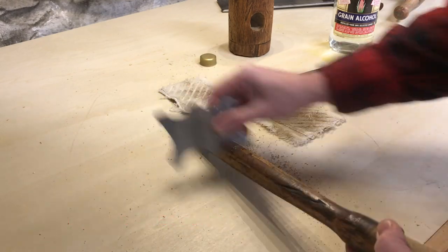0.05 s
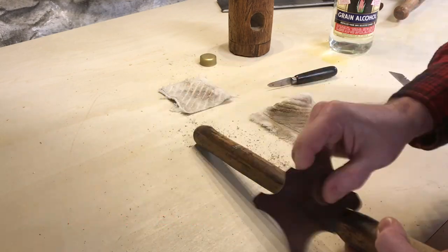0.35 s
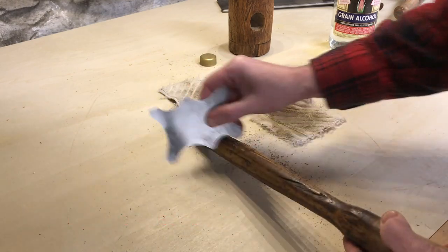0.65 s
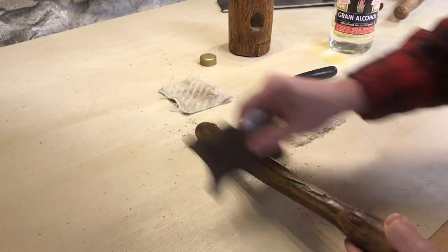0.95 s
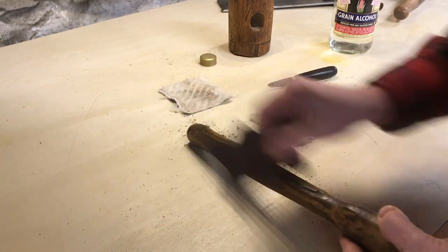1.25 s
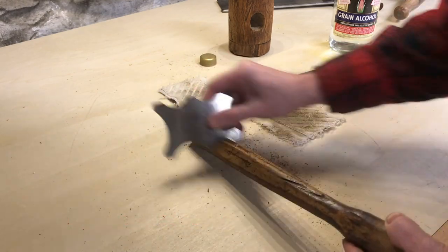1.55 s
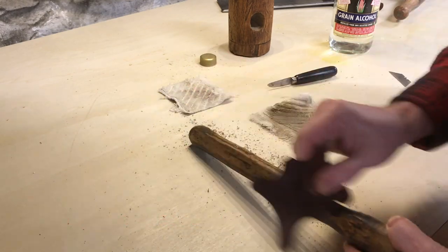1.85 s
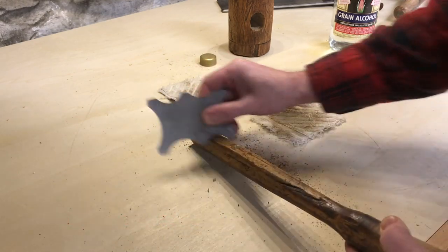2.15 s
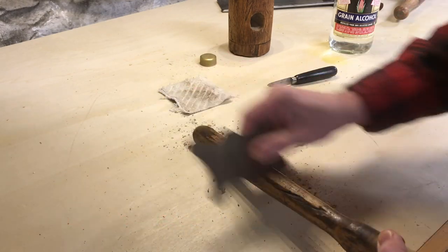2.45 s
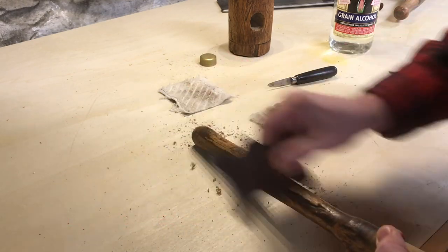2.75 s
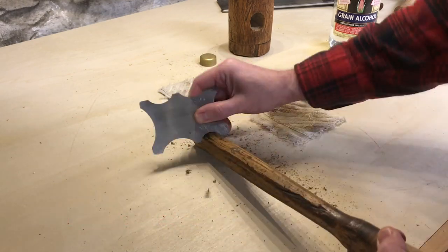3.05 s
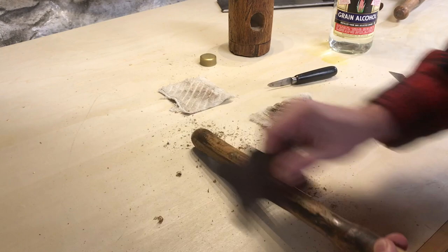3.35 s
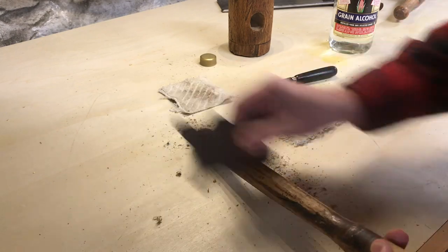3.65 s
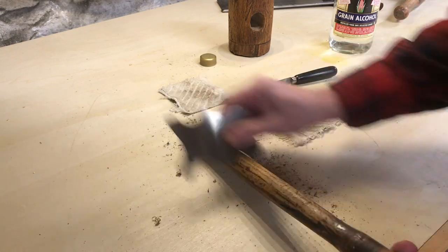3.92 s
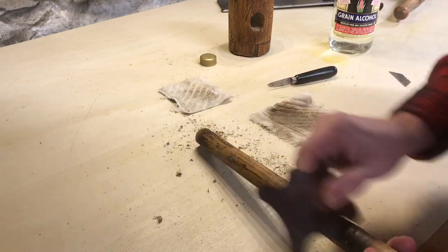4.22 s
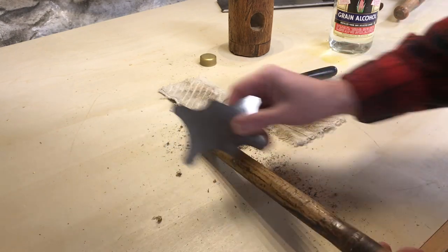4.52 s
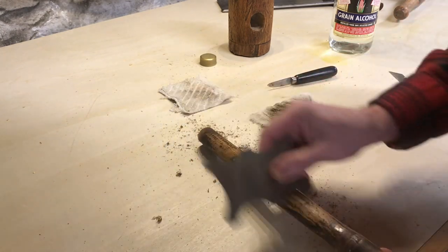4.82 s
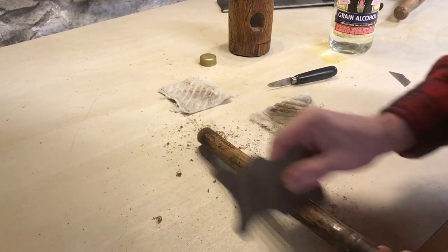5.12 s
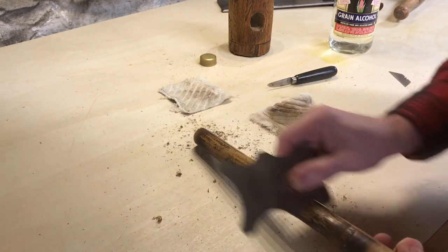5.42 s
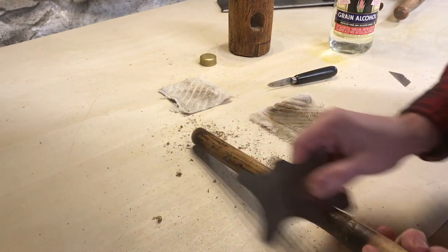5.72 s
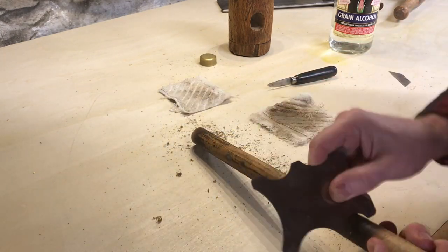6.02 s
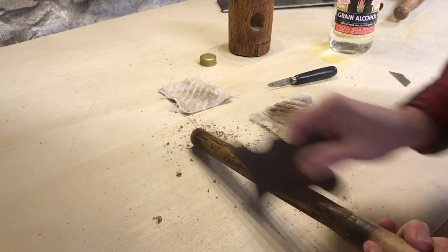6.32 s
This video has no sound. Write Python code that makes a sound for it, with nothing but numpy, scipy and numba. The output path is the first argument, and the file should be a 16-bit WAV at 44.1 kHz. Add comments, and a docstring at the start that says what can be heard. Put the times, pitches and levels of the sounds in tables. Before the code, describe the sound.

A thin steel scraper is pulled along a wooden handle about twice a second, each stroke a dry rasp with a bright metallic ring. Between pulls the blade lands with a light knock or a soft drag, and in the earlier strokes its edge sometimes catches with a tiny squeak. Toward the end the strokes get shorter and softer and the knocks sharper. It is heard close in a small workshop with a faint low hum.

```python
"""A steel card scraper takes old finish off a wooden handle on a workbench, heard close on one microphone.
The blade lands with a knock or a light drag, then is pulled along the wood: fibres tear, blade and
handle ring. Now and then the edge catches with a short squeak; faint rustles fall between some pulls.
The place is a small workshop: faint, short reflections from near walls, and a low hum behind the work."""
import sys
import numpy as np
from scipy import signal
from scipy.fft import rfft, irfft, next_fast_len
from scipy.io import wavfile
from scipy.ndimage import uniform_filter1d
from numba import njit

SR = 44100
rng = np.random.default_rng(int(sys.argv[2]) if len(sys.argv) > 2 else 0)


def waveform_to_disk(signal):
    """Save audio, clipped to [-1, 1], as 16-bit WAV at the path in sys.argv[1]."""
    frames = np.transpose(np.atleast_2d(signal))
    scaled = np.clip(frames, -1, 1) * 32767
    samples = np.round(scaled).astype(np.int16)
    wavfile.write(sys.argv[1], SR, samples)


N = 280917
T = np.arange(N) / SR

# room tone, the still air of the workshop: frequency_hz, density_db
AIR_SPECTRUM = [(25, -15.5), (55, 12), (90, 6), (170, 3), (260, -2.5), (370, 2), (500, -16), (750, -11),
                (950, -16.5), (1600, -20.5), (4500, -25), (8000, -30.5), (16000, -30.5)]
# workshop hum: pitch_hz, level_db, unsteadiness (0-1)
HUM_LINES = [(65, -60, 0.3), (82.8, -68, 1), (119, -66.5, 0.3)]
# slow wavering of the hum's deepest lines: time_s, level_db
HUM_WAVER = [(0.0, -55), (0.12, -66), (0.53, -53), (0.65, -65.5), (0.94, -57), (2.61, -66), (2.68, -58),
             (3.74, -60.5), (3.85, -75), (3.99, -59.5), (4.67, -68.5), (4.74, -54.5), (5.73, -63),
             (5.78, -53.5), (6.16, -57), (6.37, -68)]
# the handle ringing on the bench: pitch_hz, level_db, t60_s
WOOD_MODES = [(239, -5.5, 0.16), (323, -6.5, 0.32), (397, -7, 0.25), (577.3, -4, 0.13), (658, -8, 0.19),
              (778, -15, 0.11), (931, -4.5, 0.052), (1116, -4.5, 0.059), (1367, -9.5, 0.057),
              (1590, -6.5, 0.026), (1800, -3, 0.033), (2050, 1, 0.025), (2420, -2.5, 0.026),
              (3146, -4, 0.025), (3950, -5, 0.035), (5570, -7, 0.043)]
# the blade lands and the handle hits the bench: start_s, level_db, centre_hz
KNOCKS = [(0.788, -30, 830), (0.806, -34, 670), (1.296, -29, 1000), (1.2995, -40, 900), (1.309, -35, 786),
          (1.815, -41, 800), (2.341, -25.5, 870), (2.348, -37, 810), (2.656, -41.5, 1160),
          (2.777, -41.5, 696), (2.792, -43, 760), (3.297, -26, 1870), (3.302, -29, 1030),
          (3.365, -26.5, 1050), (3.575, -34.5, 1800), (3.741, -42, 1390), (3.764, -36.5, 1260),
          (4.243, -35.5, 810), (4.675, -27, 2030), (4.689, -35, 1770), (5.025, -29, 1270),
          (5.031, -17.5, 1970), (5.3177, -21, 1710), (5.663, -22.5, 1900), (6.234, -46, 906)]
# blade modes that a catch rings: pitch_hz, width_hz, level_db
CATCH_MODES = [(2280, 180, -7.5), (4366, 340, -3.5), (6200, 670, -3.5), (9700, 970, 1), (13030, 400, -2.5),
               (15300, 1100, -6)]
# the edge catches: middle_s, length_s, level_db
CATCHES = [(0.0616, 0.010, -24.5), (1.025, 0.013, -28.5), (1.427, 0.0021, -33), (2.046, 0.01, -28),
           (2.53, 0.01, -30), (3.44, 0.0015, -44), (3.88, 0.0022, -41)]
# light drags and faint, soft rustles between pulls: start_s, end_s, low_db, mid_db, hiss_db
DRAGS_AND_RUSTLES = [ (0.147, 0.232, -69, -74, -74), (.279, 0.369, -49.5, -50, -52.5),
                     (0.76, 0.856, -48, -51, -56.5), (1.143, 1.295, -65, -85, -90),
                     (1.293, 1.346, -45, -51, -53), (1.647, 1.731, -62, -66, -66),
                     (1.76, 1.85, -54, -51.5, -56), (2.134, 2.225, -68.5, -77, -79),
                     (2.65, 2.76, -57.5, -65, -65.5), (2.725, 2.823, -52.5, -56, -58.5),
                     (3.065, 3.135, -65, -69, -72), (3.668, 3.735, -51.5, -49, -51.5),
                     (3.74, 3.79, -46.5, -52, -53), (4.215, 4.27, -47.5, -53.5, -52.5),
                     (4.533, 4.67, -78, -78.5, -92), (6.013, 6.051, -53, -60, -60.5),
                     (6.26, 6.322, -76, -82.5, -89)]
# pulls along the handle: start_s, end_s, start_place, end_place (0-1 along the wood),
# ring_db (extra on the blade's lowest bending note), handle_db, blade_db, hiss_db, pressure_rise_db
PULLS = [ (-.053, 0.143, 0.12, 0.94, 2, -44, -39.5, -40.5, 0),
         (0.366, 0.627, 0.03, 1, 0, -45.5, -37.5, -41.5, 0),
         (0.854, 1.11, .05, 0.82, -1, -46, -39, -41, -0.5),
         (1.351, 1.624, .05, 0.88, 2.5, -47, -40, -40.5, -2.5),
         (1.847, 2.123, 0, 1, 2.5, -46, -39, -39.5, 3.5),
         (2.362, 2.622, .1, 1, 5.5, -45.5, -38.5, -41.5, 5),
         (2.834, 3.066, 0.11, .95, 4, -44.5, -37.5, -40.5, 6),
         (3.31, 3.555, 0.2, 0.96, 7, -42.5, -37.5, -41.5, -4.5),
         (3.793, 4.037, 0.07, 0.76, 5.5, -43.5, -36.5, -40, -0.5),
         (4.272, 4.491, 0.3, .6, 6, -46, -37.5, -42.5, 0.5),
         (4.676, 4.897, 0.4, 0.44, -0.5, -49.5, -41.5, -47, 5.5),
         (5.037, 5.212, .4, .62, -2.5, -48.5, -42.5, -50, -1.5),
         (5.347, 5.533, .2, 0.5, -3.5, -51, -45, -50, -8), (5.686, 5.88, .1, .8, -3, -48.5, -42.5, -47, -1),
         (6.052, 6.247, 0.4, 0.7, -1.5, -46.5, -41.5, -46.5, 1)]
# how handle, blade and hiss (a row each) answer a pull:
# attack_s, release_s, rise_db, mid_swell_db, after_ring_db, after_ring_t60_s
PULL_SHAPES = [(0.047, 0.067, 2.5, -1, -17, 0.15), (0.061, 0.03, -10.5, 8, -39.5, 0.21),
               (0.039, 0.045, -3, 6.5, -32, .15)]
# tearing fibres: frequency_hz, density_db
TEARING_SPECTRUM = [(150, -20), (330, 5.5), (500, -27), (900, -0.5), (1750, -9), (2300, -2), (2750, -13),
                    (3600, 8.5), (6000, -6.5), (8000, 0.5), (9300, 6), (10400, -3), (13000, 2.5),
                    (16000, -1)]
# resonances that shift as the edge travels: place_0_hz, place_1_hz, width_hz, level_db
SCRAPE_MODES = [(237, 210, 25, -26), (334.3, 335, 7.3, -10.5), (382.2, 385, 14, -8), (443, 390, 18, -18),
                (561, 574, 13, -19), (648, 663, 17, -21.5), (881, 925, 64, -7), (982, 1030, 110, -12.5),
                (1202, 1250, 50, -14), (1284, 1445, 47, -9), (1945, 2420, 160, -9.5),
                (2171, 2260, 58, -9.5), (2964, 3300, 19, -19), (3416, 3700, 240, -18.5),
                (3790, 5050, 120, 3), (4398, 4420, 37, 0), (5210, 6000, 150, -4.5), (5536, 5650, 170, 0.5),
                (6800, 6770, 30, -9.5), (6070, 7400, 150, -17), (8500, 8700, 180, -9),
                (9020, 10000, 160, -18), (9940, 9820, 130, -12), (10750, 10705, 50, -6),
                (12600, 12860, 120, -4), (13820, 13850, 260, -10), (14500, 13000, 220, -15.5),
                (15300, 12000, 190, -9)]
# when in a pull the blade's main notes sing best: pitch_hz, progress (0-1)
BEST_SINGING = [(3850, 0.26), (4370, 0.37), (5600, 0.33)]


def from_db(db):
    """Decibels to gain."""
    return 10 ** (np.asarray(db) / 20)


def rms_one(x):
    """Scale to rms 1."""
    return x / np.sqrt(np.mean(x ** 2) + 1e-20)


def steady(x):
    """Even out swells longer than 30 ms, keeping the grain; rms 1."""
    return x / np.sqrt(np.abs(uniform_filter1d(x ** 2, int(.03 * SR))) + 1e-12)


def drift(rate_hz):
    """Smooth random wander with about `rate_hz` turns a second; rms 1."""
    r = np.exp(-80 * np.pi * rate_hz / SR)
    noise = rng.standard_normal(N // 40 + 2002)   # one value every 40 samples
    slow = signal.lfilter([1], [1, -2 * r, r * r], noise)[2000:]
    return np.interp(np.arange(N) / 40, np.arange(len(slow)), rms_one(slow))


def colour(x, spectrum):
    """Give x a smooth spectrum; rms 1."""
    hz, db = np.transpose(spectrum)
    size = next_fast_len(N)
    bins_hz = np.arange(size // 2 + 1) * SR / size
    gain = from_db(np.interp(np.log(bins_hz + 1), np.log(hz), db))
    return rms_one(irfft(rfft(x, size) * gain, size)[:N])


def band(x, edges_hz, order):
    """Butterworth band-pass."""
    return signal.sosfilt(signal.butter(order, edges_hz, "band", fs=SR, output="sos"), x)


@njit
def resonate(x, hz, width_hz):
    """A resonance whose centre may move from sample to sample."""
    turn = 2 * np.pi * hz / SR
    decay = np.exp(-np.pi * width_hz / SR)
    out, state = np.zeros(len(x)), 0j
    for i in range(len(x)):
        state = state * decay * complex(np.cos(turn[i]), np.sin(turn[i])) + x[i]
        out[i] = state.real
    return out


def room_tone(air_db, waver_share):
    """Behind the work: low, wavering hum lines over quiet air."""
    out = from_db(air_db) * colour(rng.standard_normal(N), AIR_SPECTRUM)
    waver_db = np.interp(T, *np.transpose(HUM_WAVER))
    waver = from_db(waver_share * (waver_db - waver_db.mean()))
    for hz, db, unsteady in HUM_LINES:
        swell = 1 - unsteady + unsteady * (drift(2.6) + 1j * drift(3.0)) / 2   # level and phase wander
        if hz < 100:
            swell *= waver
        out += from_db(db) * rms_one(np.real(swell * np.exp(2j * np.pi * hz * T)))
    return out


def workshop(direct, tail_db, t60_s):
    """Dense reflections from the bench and near walls reach the microphone 3 ms after the direct sound."""
    t = T[:SR // 3]
    tail = band(rng.standard_normal(len(t)), [200, 7000], order=1)
    tail *= from_db(-60 * t / t60_s) * (t > .003)
    return direct + from_db(tail_db) * signal.fftconvolve(direct, tail / np.linalg.norm(tail))[:N]


def knocks(gain_db, spread_octaves, rattle_db, rattle_t60_s, tick_db, tick_t60_s):
    """Each blow rings the wood modes near its centre, with a brief bench rattle and a steel tick."""
    out, t = np.zeros(N + SR), T[:SR // 4]
    hz, mode_db, t60_s = np.transpose(WOOD_MODES)[:, :, None]
    modes = np.sin(2 * np.pi * hz * t) * from_db(-60 * t / t60_s)
    for start_s, db, centre_hz in KNOCKS:
        weight = from_db(mode_db + rng.normal(0, 0.96, hz.shape))
        weight /= 1 + (np.log2(hz / centre_hz) / spread_octaves) ** 2
        ring = np.sum(weight * rng.choice([-1, 1], hz.shape) * modes, axis=0)
        rattle = band(rng.standard_normal(len(t)), [centre_hz * 0.26, centre_hz * 1.16], order=3)
        rattle = rms_one(rattle) * from_db(rattle_db - 60 * t / rattle_t60_s)
        tick = rng.standard_normal(len(t)) * from_db(tick_db - 60 * t / tick_t60_s)
        blow = ring / np.abs(ring).max() + rattle + tick
        at = int(start_s * SR)
        out[at:at + len(t)] += from_db(db + gain_db) * blow / np.abs(blow).max()
    return band(out[:N], [200, 16000], order=2)


def catches(gain_db):
    """The edge sticks and lets go in a bright burst on the blade's upper modes."""
    squeak = np.zeros(N)
    for hz, width_hz, db in CATCH_MODES:
        squeak += from_db(db) * rms_one(resonate(rng.standard_normal(N), np.full(N, hz), width_hz))
    bursts = sum(from_db(db) / (1 + (2 * (T - middle_s) / length_s) ** 8)
                 for middle_s, length_s, db in CATCHES)
    return from_db(gain_db) * steady(band(squeak, [1500, 16000], order=2)) * bursts


def hand(resting_place, resting_ring_db):
    """The hand's travel: progress through the pull, place of the edge, freedom of the blade to ring."""
    progress, place, ring_db = np.zeros(N), np.full(N, resting_place), np.full(N, resting_ring_db)
    for start_s, end_s, start_place, end_place, db, *_ in PULLS:
        during = (T >= start_s) & (T < end_s)
        progress[during] = (T[during] - start_s) / (end_s - start_s)
        place[during] = start_place + (end_place - start_place) * progress[during]
        ring_db[during] = db
    return progress, place, ring_db


def stroke(start_s, end_s, attack_s, release_s):
    """A rubbing contact sets in, holds and lets go; gain 0-1."""
    return np.clip((T - start_s) / attack_s, 0, 1) * np.clip((end_s - T) / release_s, 0, 1)


def drag_and_rustle_power(attack_s, release_s, sag_db_per_s):
    """Power in three bands of the light drags and faint, soft rustles between pulls; each one fades."""
    power = np.zeros((3, N))
    for start_s, end_s, *levels_db in DRAGS_AND_RUSTLES:
        sag = from_db(-sag_db_per_s * np.maximum(T - start_s, 0))
        power += (from_db(levels_db)[:, None] * sag * stroke(start_s, end_s, attack_s, release_s)) ** 2
    return power


def pull_power():
    """Power of handle, blade and hiss: each pull follows the hand's speed and pressure, then rings on."""
    power = np.zeros((3, N))
    for start_s, end_s, _, _, _, *levels_db, pressure_db in PULLS:
        from_middle = np.clip((T - start_s) / (end_s - start_s), 0, 1) - .5
        for layer, db, shape in zip(power, levels_db, PULL_SHAPES):
            attack_s, release_s, rise_db, swell_db, after_db, t60_s = shape
            effort = from_db((pressure_db + rise_db) * from_middle - swell_db * (2 * from_middle) ** 2)
            contact = effort * stroke(start_s, end_s, attack_s, release_s)
            lift_off = np.clip(1 + (T - end_s) / release_s, 0, 1)
            after_ring = lift_off * from_db(after_db - 60 * np.maximum(T - end_s, 0) / t60_s)
            layer += (from_db(db) * (contact + after_ring)) ** 2
    return power


def friction(snaps_per_s, spread_db, judder_db):
    """Fibres snap as clicks of uneven size, in clumps as the edge sticks and slips."""
    sizes = from_db(spread_db * np.minimum(rng.exponential(1, N), 4)) * rng.standard_normal(N)
    snapping = rng.random(N) < snaps_per_s / SR
    return rms_one(sizes * snapping * from_db(judder_db * drift(110)))


def scraping(tearing_db, waver_db, swell_db, grain_db, damping_db, tilt):
    """Friction rings blade and handle; the hand's travel bends the resonances and damps the blade."""
    progress, place, ring_db = hand(resting_place=0.24, resting_ring_db=-3.5)
    snaps = friction(snaps_per_s=15000, spread_db=1.5, judder_db=0.3)
    scrape = from_db(tearing_db) * colour(snaps, TEARING_SPECTRUM)
    for base_hz, far_hz, width_hz, db in SCRAPE_MODES:
        hz = base_hz + (far_hz - base_hz) * (place + tilt * drift(7))   # the blade tilts in the hand
        unevenness = np.clip(hz.mean() / 1500, .3, 1)   # the heavy handle's low notes are steadier
        drive = snaps * from_db(unevenness * (waver_db * drift(30) + swell_db * drift(2.25)))
        if 1800 < base_hz < 2600:   # the blade's lowest bending note
            db = db + ring_db
        if 3600 < base_hz < 6000:   # its main notes, damped away from their best moment
            best = np.interp(base_hz, *np.transpose(BEST_SINGING))
            db = db + damping_db * (1 - np.exp(-((progress - best) / 0.4) ** 2))
        scrape += from_db(db) * rms_one(resonate(drive, hz, width_hz))
    bands_hz = [(190, 2800), (2800, 7600), (7600, 17000)]   # handle, blade, hiss
    layers = [steady(band(scrape, edges_hz, order=5)) for edges_hz in bands_hz]
    power = pull_power() + drag_and_rustle_power(attack_s=0.0066, release_s=0.036, sag_db_per_s=22.5)
    return np.sum(layers * np.sqrt(power), axis=0) * from_db(grain_db * drift(25))


def scene():
    """Close to the bench, in mono: scraping, catches and knocks, with the humming room behind."""
    work = scraping(tearing_db=-1.5, waver_db=4.0, swell_db=2.5, grain_db=0.21,
                    damping_db=-17.5, tilt=0.11)
    work += catches(gain_db=-2.5)
    work += knocks(gain_db=-0.5, spread_octaves=0.85, rattle_db=-14.5, rattle_t60_s=0.089,
                   tick_db=-19.5, tick_t60_s=0.026)
    work_in_room = workshop(work, tail_db=-20.5, t60_s=0.19)
    return (work_in_room + room_tone(air_db=-66, waver_share=0.8))[None]


def record(dry):
    """The microphone's signal is cut steeply above 16.2 kHz."""
    return signal.sosfilt(signal.ellip(12, .1, 80, 16200, fs=SR, output="sos"), dry)


dry = scene()
out = record(dry)
waveform_to_disk(out)
```